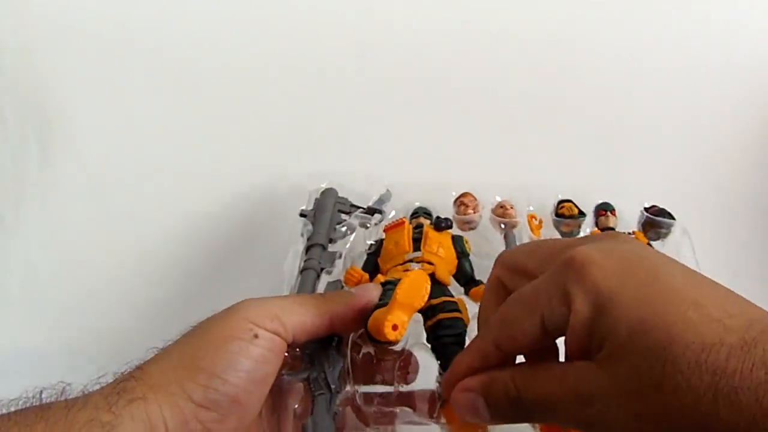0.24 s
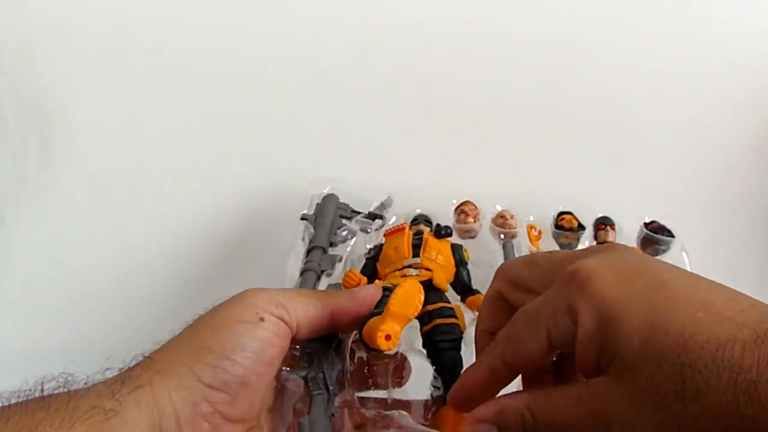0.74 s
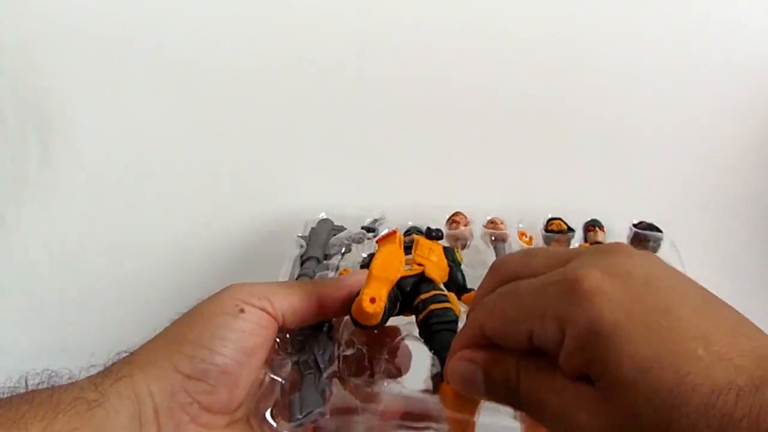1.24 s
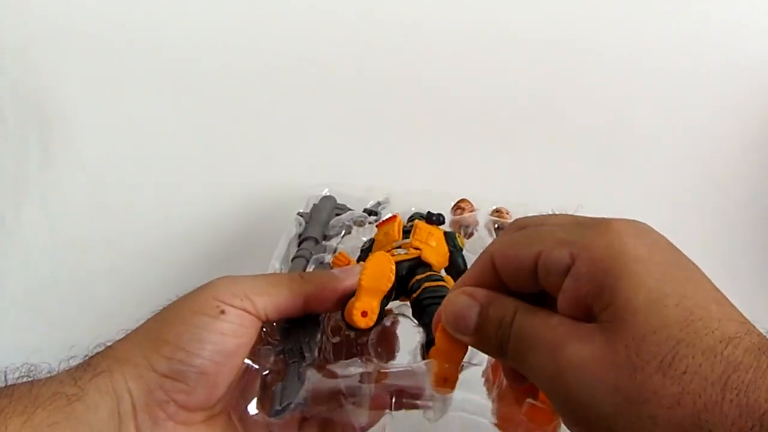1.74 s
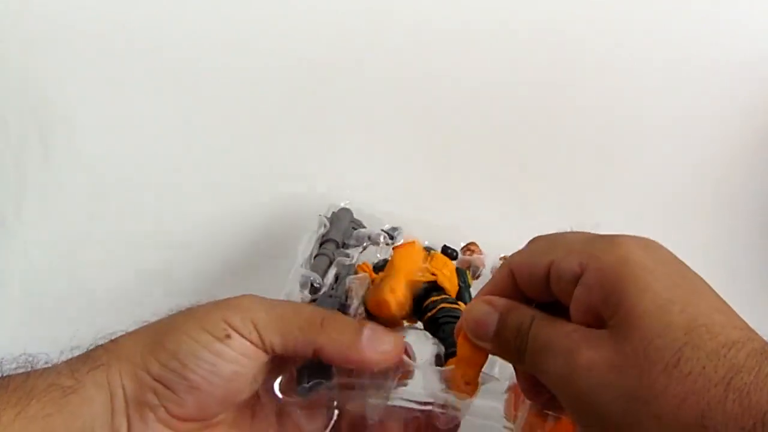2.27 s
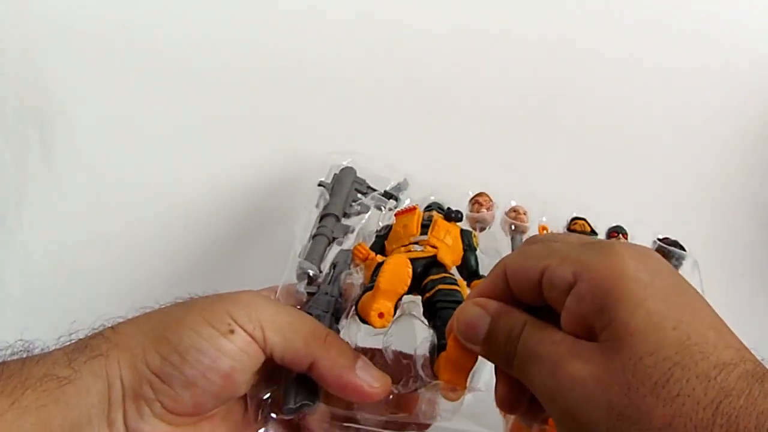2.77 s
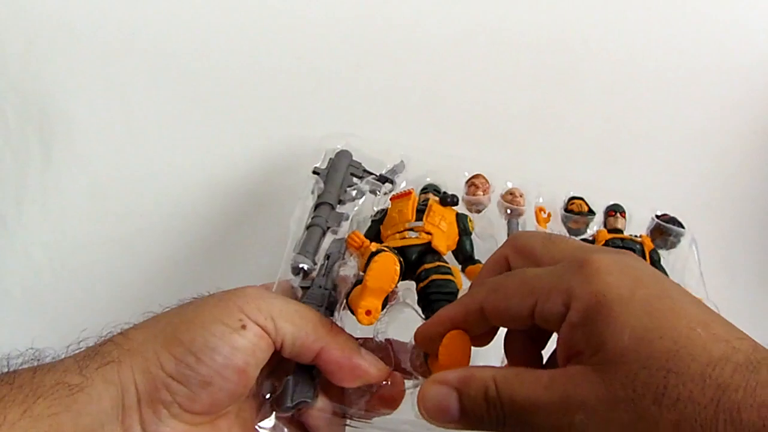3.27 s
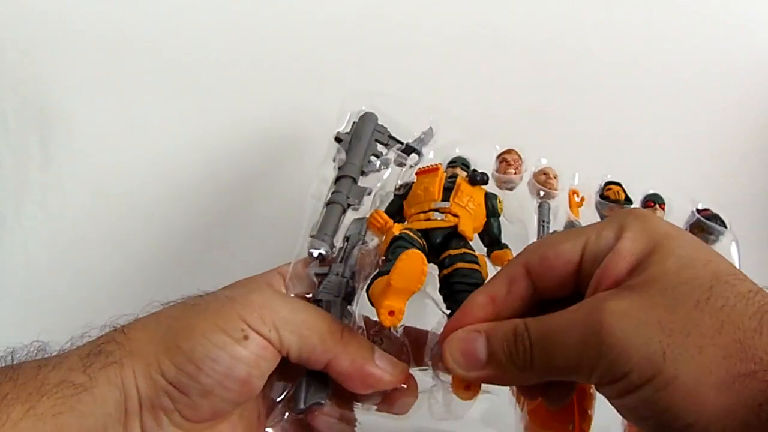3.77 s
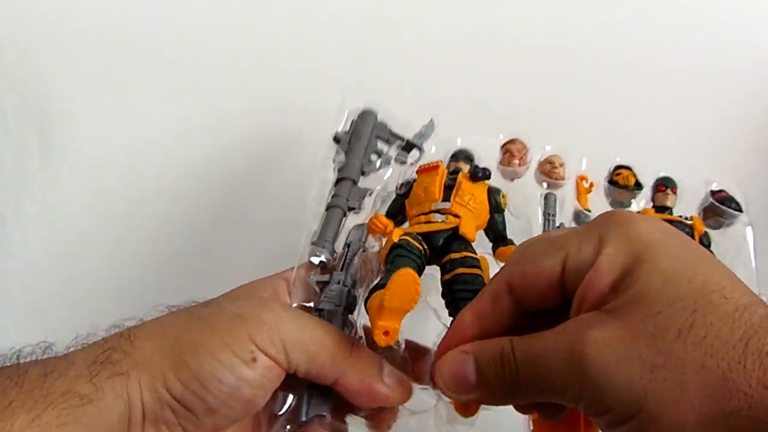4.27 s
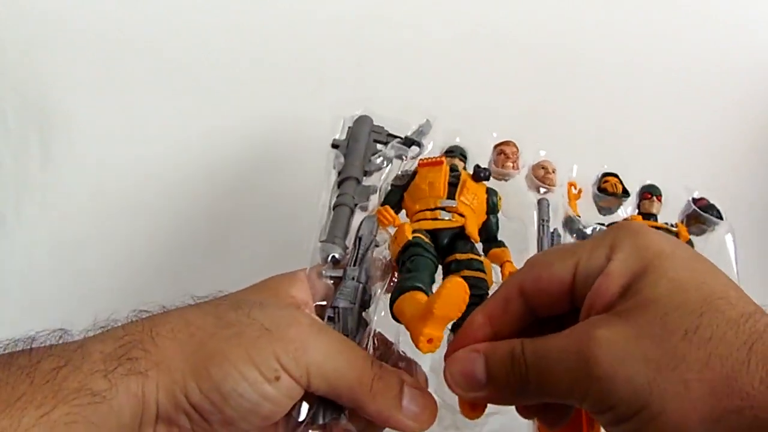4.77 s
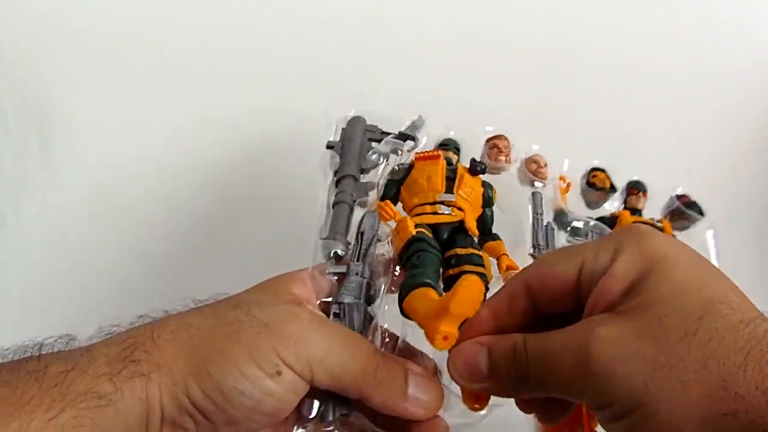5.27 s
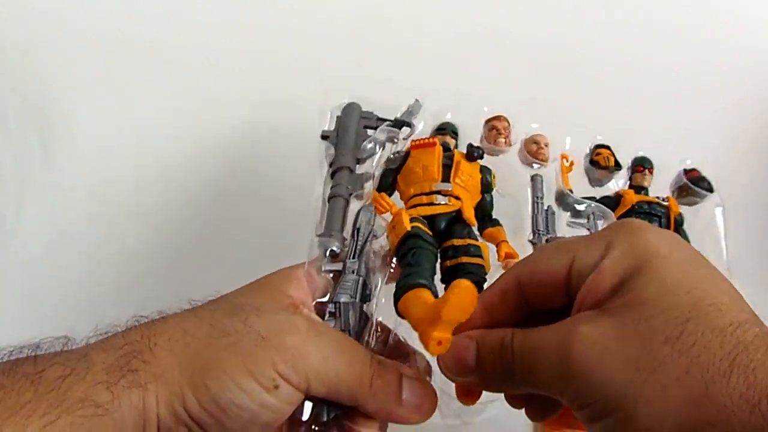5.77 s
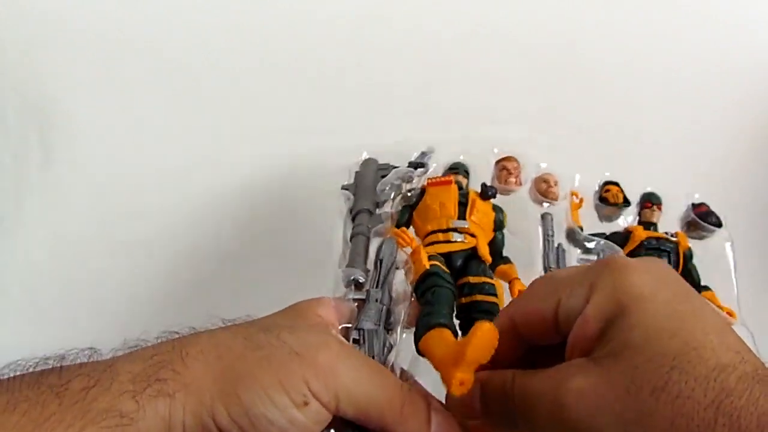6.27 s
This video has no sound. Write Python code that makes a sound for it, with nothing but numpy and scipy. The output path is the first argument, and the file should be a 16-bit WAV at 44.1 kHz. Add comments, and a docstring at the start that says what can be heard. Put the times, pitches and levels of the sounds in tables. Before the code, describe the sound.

Close to the microphone in a small room, a thin plastic tray crinkles and clicks as a toy figure is worked loose by hand. Short scratchy scrapes and dull finger taps mix with crisp, uneven pops of the flexing plastic. The crackling keeps coming in bursts, eases briefly near the end, then returns with another scrape and a sharp snap. A faint handling rumble and steady room air lie underneath.

```python
"""Sharp snaps lead: facets of a thin plastic blister tray buckle as two hands pry a toy figure out of it.
Each snap is a noise crack, a short ping and damped sheet modes, with a kick to the hollow tray.
The figure scrapes along its pocket in fine crackle, made of clumped stick-slip jerks that set off tiny rattles.
Fingers knock low ringing modes of the tray; handling rumble and room air, both coloured noise, lie beneath.
Everything is close to a microphone, with the short tail of a small room."""
import sys
import numpy as np
from scipy import signal
from scipy.io import wavfile
from scipy.ndimage import uniform_filter1d

SR = 44100
rng = np.random.default_rng(int(sys.argv[2]) if len(sys.argv) > 2 else 0)


def wav_out(sig):
    """Save sig, one row per channel (or a flat mono array), as 16-bit PCM at SR to the path in sys.argv[1]."""
    wavfile.write(sys.argv[1], SR, np.round(np.clip(np.atleast_2d(sig).T, -1, 1) * 32767).astype(np.int16))


N = 287658

# Facets that buckle audibly; the kick drives the hollow tray, relative to the level of the snap.
# Columns: start_s, level_db, brightness_db_per_octave, kick_db, ping_hz
FACET_SNAPS = [(0.192, -42, -4.5, 10.5, 1290), (0.2185, -40.5, 1.5, -15, 8900), (0.2549, -40, 4, -17, 6640),
               (0.3635, -47, -8.5, 13, 980), (0.392, -46, 3, 8, 12800), (0.416, -35.5, -2.5, -2, 1050),
               (0.44, -42, -5, -8, 1510), (0.4997, -41.5, 3, -7, 2200), (0.606, -36, -2.5, -1, 3400),
               (0.6518, -32.5, 3, -18, 13000), (0.677, -36, 3, -7, 6030), (0.7, -30, 2, -5, 3760),
               (0.7055, -25.5, -.5, -23, 12900), (0.915, -38, 0.5, -19, 4050),
               (1.0741, -39, -1.5, -7, 2130), (1.1681, -34, -3, -4, 3640), (1.182, -40, 3, 0, 1940),
               (1.1994, -31, 2.5, -2, 4750), (1.2782, -40.5, 6, 2, 5570), (1.406, -42.5, 2.5, -9, 14130),
               (1.419, -41, -0.5, -24, 2180), (1.484, -45.5, -3.5, -7, 1840), (1.5086, -39.5, 2, -1, 1770),
               (1.6673, -37, 2, -22, 14250), (1.768, -32, 0, -13, 3080), (1.8715, -37.5, -0.5, -6, 2780),
               (1.9272, -40.5, 2, -8, 2190), (2.012, -29, 1, -22, 2640), (2.048, -30.5, 0.5, -8, 4670),
               (2.0709, -25, -2.5, -8, 3430), (2.0946, -38, 0, 4, 6070), (2.136, -41, 0.5, -14, 12000),
               (2.198, -43.5, 3, -12, 5100), (2.3018, -37, -4, -3, 5230), (2.3537, -45.5, 5, -20, 12320),
               (2.421, -40.5, -3, 4.5, 2120), (2.5124, -34, -0.5, -1, 1750), (2.6491, -43, 2, -22, 12200),
               (2.6752, -41.5, -4, 3, 1850), (2.7825, -36, 0, -7, 1300), (2.8255, -32, 0, 5, 2970),
               (2.829, -22, -0.5, -0.5, 980), (2.834, -25, 1.5, -19, 2800), (2.882, -40, 3.5, -8, 3880),
               (3.0744, -44.5, 2.5, -20, 4700), (3.1095, -45, -5.5, 1, 5060),
               (3.1719, -50, -6.5, 12.5, 1860), (3.343, -45.5, 0, -4, 1470), (3.404, -48, 8, -17, 4800),
               (3.4186, -30, -1.5, -5.5, 2920), (3.4418, -40, 4, -3, 9300),
               (3.5213, -38.5, 0.5, -10, 13290), (3.5334, -39.5, -5, 6.5, 1840),
               (3.5908, -41, -1.5, 0, 3080), (3.663, -47.5, -2.5, -7, 1440), (3.696, -37.5, 1, -10, 3780),
               (3.7828, -38, 3, 4.5, 2260), (3.9232, -43.5, 1.5, 5.5, 14000),
               (4.1041, -23.5, 3, -9.5, 12360), (4.119, -28.5, -2.5, -1.5, 1850),
               (4.1995, -40, 4.5, -10, 12400), (4.3071, -33.5, -1.5, 2, 1490), (4.387, -37.5, 0, -10, 2430),
               (4.4206, -33.5, 1, -22, 4740), (4.4345, -23, .5, -19, 2920), (4.4372, -25, -2.5, -3, 1670),
               (4.446, -35.5, 3, 9.5, 1320), (4.6375, -34, -2.5, -5, 3780), (4.918, -36.5, -0.5, 3, 1540),
               (4.9309, -38.5, -6, 8, 1380), (4.974, -41, 5.5, -2, 4140), (5.038, -48, 6, -10, 12200),
               (5.0445, -38.5, 0.5, -5, 4800), (5.099, -28, -.5, -25, 5230), (5.2082, -39, -5.5, 7, 2740),
               (5.287, -43, 4, -15, 6030), (5.3228, -26, -1.5, -11, 2080), (5.35, -29, -3, -3, 1730),
               (5.383, -43, 5.5, -20, 6090), (5.4134, -34.5, -.5, -8, 1840), (5.9935, -28.5, 0.5, -9, 5660),
               (6.061, -38, 2.5, -10, 13400), (6.0941, -33, -1.5, -5, 1530), (6.1961, -41.5, 0, -1, 1480),
               (6.2542, -23.5, 0, 0, 3220), (6.4747, -42, -.5, 0, 4900), (6.49, -40, 0.5, -10, 1370)]
# Bands where large facets, small facets and creases ring. Columns: low_hz, high_hz
SHEET_ZONES = [(920, 2500), (2500, 6500), (6500, 15800)]
# Figure sliding in its pocket; hollow and fizz are relative to the force.
# Columns: start_s, length_s, force_db, hollow_db, fizz_db
SLIDE_STROKES = [(0.0, .045, -45, 10, -11), (0.164, .17, -45, 6, -4), (0.36, .15, -38.5, 5.5, -3.5),
                 (0.637, 0.086, -32.5, 2.5, -3), (0.73, .06, -45, -12, -6), (0.83, 0.073, -49.5, 2, -2),
                 (1.016, 0.013, -44.5, -14, -2), (1.157, 0.12, -37, -6.5, -3), (1.384, 0.2, -48.5, -20, 0),
                 (1.672, 0.16, -50.5, -3.5, 2), (1.875, 0.075, -39.5, 2.5, -9),
                 (2.009, .045, -37.5, -4, -12), (2.068, 0.033, -30.5, 0.5, -2.5),
                 (2.277, 0.03, -38.5, -4, -1.5), (2.363, 0.066, -42.5, -1.5, -7),
                 (2.507, 0.053, -43, -2, -11), (2.817, 0.083, -38.5, -2, -3),
                 (3.113, 0.017, -45.5, 2.5, -5), (3.269, 0.045, -46, -13, -26),
                 (3.362, 0.1, -38.5, -1, -4.5), (3.534, .06, -52, 8, -25), (3.947, 0.26, -46, 4.5, -23),
                 (4.063, 0.013, -37, 1.5, -5), (4.117, 0.094, -39.5, -1, -15),
                 (4.297, 0.07, -35.5, 1, -2.5), (4.441, 0.042, -35.5, -6, -4),
                 (4.507, 0.036, -45.5, 4, -14), (4.772, 0.018, -37, -6, -2.5), (4.853, .03, -55, 12, 2),
                 (4.941, 0.087, -41, 1.5, -6), (5.082, 0.046, -36.5, 2, 0), (5.211, 0.064, -32, -4, -5),
                 (5.3, 0.11, -41.5, -1, -6), (5.437, .16, -49, 2.5, -2), (5.828, 0.1, -37, -2, -5),
                 (5.892, .13, -35, 2, -3.5), (6.072, 0.021, -39, 6, -7), (6.11, 0.16, -49.5, 3, -4),
                 (6.25, 0.05, -43, 2, -2), (6.455, 0.022, -49, -15, -3)]
# Holding hand that keeps the sheet creaking faintly; fizz is relative to the force.
# Columns: time_s, force_db, fizz_db
HOLDING_GRIP = [(0, -49, -5), (.55, -46.5, -6), (1.0, -44.5, -4), (1.65, -52.5, -1), (2.3, -49, -3),
                (2.65, -48.5, -4), (3.0, -53, -14), (3.25, -56, -20), (3.55, -46, -18), (3.85, -50, -14),
                (4.4, -43.5, -16), (4.75, -50.5, -3), (5.5, -54.5, 5), (5.75, -48.5, -5), (6.2, -44.5, -2),
                (6.4, -54, -6), (6.52, -50, -5)]
# Spectrum of the coarse scrape. Columns: frequency_hz, gain_db
SCRAPE_COLOUR = [(500, -44), (800, 4.5), (950, 1.5), (1500, 3.5), (2500, -3), (4800, -2), (6500, -16),
                 (8500, -17.5)]
# Spectrum of the fine fizz. Columns: frequency_hz, gain_db
FIZZ_COLOUR = [(4000, -27), (6500, 14.5), (8500, 8.5), (10000, 9), (12500, 4), (16000, 7)]
# Spectrum of fingertips landing. Columns: frequency_hz, gain_db
THUD_COLOUR = [(40, -15.5), (70, 1), (130, 1.5), (200, -0.5), (300, -28), (600, -31)]
# Soft knocks of fingers and figure on the tray, relative peaks. Columns: start_s, level_db
TRAY_KNOCKS = [(0.412, -29), (0.467, -36), (0.501, -24.5), (0.638, -33), (1.019, -29), (1.158, -37),
               (2.54, -24), (2.673, -30.5), (3.097, -29), (3.172, -33), (4.222, -25), (4.295, -19),
               (4.361, -20.5), (4.447, -26.5), (4.476, -29), (4.857, -34), (5.081, -24), (5.229, -23.5),
               (6.395, -27.5)]
# Modes of the hollow tray, before the grip detunes them. Columns: pitch_hz, level_db, t60_s
TRAY_MODES = [(271, -7.5, 0.066), (325, -5.5, 0.053), (379.6, 3, 0.055), (444, 0, 0.034), (500, 2, 0.04),
              (577, 0, 0.035), (632, -12.5, 0.055), (747.4, -4, 0.11)]
# Shifts of the whole tray, with a low rumble. Columns: start_s, length_s, level_db
TRAY_SHIFTS = [(0.2, 0.53, -58), (2.414, 0.41, -49), (3.272, 0.37, -44.5), (3.7, 0.81, -53.5),
               (5.003, .48, -58.5), (5.865, .17, -46.5)]
# Spectrum of the handling rumble. Columns: frequency_hz, gain_db
RUMBLE_SPECTRUM = [(8, -13), (20, 11), (40, 7.5), (60, -1.5), (110, -4), (300, -33)]
# Spectrum of the steady room air. Columns: frequency_hz, gain_db
AIR_COLOUR = [(30, -14), (100, -20.5), (200, -12.5), (370, 4.5), (550, 1), (720, -1), (1400, -13),
              (3000, -8.5), (6000, -17.5), (16000, -43)]
# Decay of the room tail. Columns: frequency_hz, t60_s
ROOM_DECAY = [(250, 0.23), (700, 0.31), (1800, 0.2), (4600, 0.36), (12000, 0.21)]
# Spectrum of the room tail at its start. Columns: frequency_hz, gain_db
ROOM_SPECTRUM = [(150, -6), (400, 4.5), (750, -4), (1400, 4.5), (3000, 0.5), (6000, -2), (15000, 2)]
# Response of the microphone. Columns: frequency_hz, gain_db
MIC_RESPONSE = [(620, 1), (680, -6.5), (850, -5.5), (920, 1), (7200, 0.5), (7650, -3), (7820, -14),
                (8000, -0.5), (8400, 0.5), (9500, -1.5), (12500, 1), (15500, -0.5)]

# share of each zone in a snap; lift of the zone that holds the ping; where brightness pivots
ZONE_DB, OWN_ZONE_DB, PIVOT_HZ = [0.5, 3, 0.5], 3, 4020
ATTACK_S, RELEASE_S = 0.025, 0.02  # rise before the start of a hand move; time constant of its release
GRIP_HOLLOW_DB = -1  # relative to the force of the grip
STILL_DB = -58  # rumble of the hands at rest, on the same scale as the shifts
TIME = np.arange(N) / SR


def snaps(sheet_db=0, body_db=1):
    """Each facet flips over, rings, and kicks the whole tray."""
    out = np.zeros(N)
    span = np.sqrt(0.005 * SR)  # sets unit energy to unit rms over 5 ms
    for start, level_db, brightness, kick_db, ping_hz in FACET_SNAPS:
        kick = unit(body_ring())
        add(out, start, span * amp(level_db + kick_db + body_db) * kick)
        add(out, start, span * amp(level_db + sheet_db) * buckle(brightness, ping_hz))
    return out


def buckle(brightness, ping_hz):
    """One facet flips: all zones of the sheet ring, its own lifted, tilted by the sharpness of the flip."""
    zones = []
    for (low_hz, high_hz), share_db in zip(SHEET_ZONES, ZONE_DB):
        octaves = np.log2(np.sqrt(low_hz * high_hz) / PIVOT_HZ)
        own_db = OWN_ZONE_DB * (low_hz <= ping_hz < high_hz)
        zones.append(amp(share_db + brightness * octaves + own_db) * facet_ring(low_hz, high_hz, ping_hz))
    return sum(zones)


def facet_ring(low_hz, high_hz, ping_hz, t60_s=0.03, fall=0.71, ping_share=1.2, ping_s=0.00075,
               crack_share=1.02, crack_s=0.0036, rise_s=0.000045, count=22, size=1200):
    """A crack, the facet's own short ping, and a cluster of damped sheet modes; higher ones die sooner."""
    t = np.arange(size) / SR
    # one mode at random in each equal slice of the band
    hz = (low_hz + (high_hz - low_hz) * (np.arange(count) + rng.random(count)) / count)[:, None]
    decay = amp(-60 * t / (t60_s * (2000 / hz) ** fall))  # t60_s and ping_s hold at 2 kHz
    modes = np.sin(2 * np.pi * (hz * t + rng.random(hz.shape))) * decay
    swell_s = ping_s * np.sqrt(2000 / ping_hz)
    ping = unit(t * np.exp(-t / swell_s) * np.sin(2 * np.pi * ping_hz * t))
    ping = (low_hz <= ping_hz < high_hz) * ping  # only its own zone pings
    band = signal.butter(3, [low_hz, high_hz], "band", fs=SR, output="sos")
    burst = np.sign(rng.standard_normal(size)) * np.exp(-t / crack_s)
    crack = unit(signal.sosfilt(band, burst))
    flip = 1 - np.exp(-t / rise_s)  # the facet takes a moment to turn over
    return unit(flip * (unit(modes.sum(axis=0)) + crack_share * crack + ping_share * ping))


def crumple(force, crumple_db=-8, brightness=1.0, low_hz=1400, high_hz=13000, count=16):
    """Lesser facets buckle at random, as hard as the sheet is forced."""
    rings = [unit(buckle(brightness, hz)) for hz in np.geomspace(low_hz, high_hz, count)]
    jerks = slips(per_s=70, spread_db=-0.5, limit=1.0)
    return amp(crumple_db) * force * evened(crackle(jerks, rings))


def ticks(force, tick_db=-51, follow=0.5, low_hz=1800, high_hz=12500, count=24):
    """Small facets let go at random, each a narrow-band rattle around its own pitch."""
    rings = []
    for hz in np.geomspace(low_hz, high_hz, count):
        edges_hz = [hz / 1.25, min(hz * 1.25, 0.45 * SR)]
        band = signal.butter(2, edges_hz, "band", fs=SR, output="sos")
        rings.append(unit(signal.sosfilt(band, grain(decay_s=0.0006))))
    strain = force ** follow  # they grow only a little with the force on the tray
    jerks = slips(per_s=45, spread_db=4.0, limit=2.9)
    return amp(tick_db) * evened(strain * crackle(jerks, rings))


def rubbing(force, pressure, fizz, press_db=-3.5, scrape_db=-2, fizz_db=-2, thud_db=-16,
            clump_db=4.0, fine_share=0.44, count=16):
    """Slips come in clumps: coarse ones scrape, coarse and fine ones fizz, and pressure shakes the body."""
    swells = evened(uniform_filter1d(rng.standard_normal(N), size=260))  # averaged over about 6 ms
    clumps = amp(clump_db * swells)
    coarse_slips = slips(per_s=2000, spread_db=2.0) * clumps
    coarse = crackle(coarse_slips, [grain(decay_s=0.0021) for _ in range(count)])
    fine_slips = slips(per_s=1900, spread_db=0.5) * clumps
    fine = crackle(fine_slips, [grain(decay_s=0.00091) for _ in range(count)])
    pushes = slips(per_s=400, spread_db=1.5) * clumps
    hollow = evened(crackle(pushes, [body_ring() for _ in range(count)]))
    pads = evened(colour(pushes, THUD_COLOUR))  # soft fingertips add a dull thud to each push
    scrape = evened(colour(coarse, SCRAPE_COLOUR))
    hiss = evened(colour(coarse + fine_share * fine, FIZZ_COLOUR))
    return (pressure * (amp(press_db) * hollow + amp(thud_db) * pads)
            + amp(scrape_db) * force * scrape
            + amp(fizz_db) * fizz * hiss)


def contact():
    """How hard grip and strokes drive the scrape, the hollow body and the fizz; their powers add."""
    s, force_db, fizz_db = np.transpose(HOLDING_GRIP)
    grip = amp([np.interp(TIME, s, force_db + share_db) for share_db in (0, GRIP_HOLLOW_DB, fizz_db)])
    gains = amp([(db, db + hollow_db, db + stroke_fizz_db)
                 for _, _, db, hollow_db, stroke_fizz_db in SLIDE_STROKES])
    moves = np.array([move(start, length) for start, length, *_ in SLIDE_STROKES])
    return np.sqrt(grip ** 2 + gains.T ** 2 @ moves ** 2)


def move(start, length):
    """Attack, hold and release of one move of the hands."""
    attack = np.clip((TIME - start) / ATTACK_S + 1, 0, 1) ** 2
    release = np.exp(-np.clip((TIME - start - length) / RELEASE_S, 0, 20))
    return attack * release


def slips(per_s, spread_db, limit=3.17):
    """Stick-slip: a random train of tiny jerks of either sign, their sizes scattered up to a limit."""
    sizes = amp(spread_db * np.minimum(rng.exponential(1, N), limit))
    return evened(sizes * rng.choice([-1, 1], N) * (rng.random(N) < per_s / SR))


def crackle(jerks, rings):
    """Each jerk sets off one of several rings, each with its own colour."""
    choice = rng.integers(0, len(rings), N)
    return sum(signal.oaconvolve(jerks * (choice == k), ring)[:N] for k, ring in enumerate(rings))


def grain(decay_s, size=300):
    """The tiny rattle of one facet after one slip: a decaying noise burst."""
    return unit(rng.standard_normal(size) * np.exp(-np.arange(size) / SR / decay_s))


def knocks(knock_db=-2):
    """Soft blows reach only the low modes of the tray."""
    out = np.zeros(N)
    for start, level_db in TRAY_KNOCKS:
        ring = body_ring()
        add(out, start, amp(level_db + knock_db) * ring / abs(ring).max())
    return out


def body_ring(detune=0.066, lowest_hz=215, size=5000):
    """The hollow tray after one push; the grip shifts its modes, and it is too small to radiate bass."""
    t = np.arange(size) / SR
    hz, db, t60 = np.transpose(TRAY_MODES)[:, :, None]
    hz = hz * (1 + detune * (2 * rng.random(hz.shape) - 1))
    modes = amp(db - 60 * t / t60) * np.sin(2 * np.pi * hz * t)
    ring = rng.choice([-1, 1], len(TRAY_MODES)) @ modes  # random polarity for each mode
    return signal.sosfilt(signal.butter(4, lowest_hz, "high", fs=SR, output="sos"), ring)


def background(rumble_db=-1, air_db=-53):
    """Low bumps of handling, stronger as the tray is shifted, and the steady air of the room."""
    shifts = sum(amp(db) * move(start, length) for start, length, db in TRAY_SHIFTS)
    handling = amp(STILL_DB) + shifts
    bumps = evened(colour(slips(per_s=330, spread_db=3.0), RUMBLE_SPECTRUM)) * handling
    air = evened(colour(rng.standard_normal(N), AIR_COLOUR))
    return amp(rumble_db) * bumps + amp(air_db) * air


def room(x, wet_db, first_s=0.004, echo_s=0.0085, echo_db=-19, size=22050):
    """A short diffuse tail of sparse echoes, plus one early bounce off the table."""
    taps = rng.standard_normal(size) * (rng.random(size) < 5000 / SR)  # 5000 echoes per second
    hz, t, z = signal.stft(taps, SR, nperseg=256)
    z = z * amp(read(ROOM_SPECTRUM, hz)[:, None] - 60 * t / read(ROOM_DECAY, hz)[:, None])
    tail = unit(signal.istft(z, SR, nperseg=256)[1])
    response = np.zeros(size)
    add(response, first_s, amp(wet_db) * tail)
    add(response, echo_s, amp([echo_db]))
    return x + signal.oaconvolve(x, response)[:N]


def amp(db):
    """Decibels to gain."""
    return 10 ** (np.asarray(db) / 20)


def evened(x):
    """Scales to rms 1."""
    return x / np.sqrt(np.mean(x ** 2) + 1e-20)


def unit(x):
    """Scales to energy 1."""
    return x / (np.linalg.norm(x) + 1e-12)


def read(points, hz):
    """Reads a curve on a log-frequency axis."""
    f, value = np.transpose(points)
    return np.interp(np.log(hz + 1), np.log(f + 1), value)


def colour(x, points):
    """Causal minimum-phase filter with the given spectrum."""
    size = 8192
    log_gain = np.log(amp(read(points, abs(np.fft.fftfreq(size, 1 / SR)))))
    # the Hilbert transform of the log gain gives the minimum phase
    taps = np.fft.ifft(np.exp(np.conj(signal.hilbert(log_gain)))).real
    return signal.oaconvolve(x, taps[:size // 2])[:len(x)]


def add(mix, s, sound):
    """Mixes a sound in at time s, in place."""
    part = mix[max(round(s * SR), 0):][:len(sound)]
    part += sound[:len(part)]


def scene():
    """The tray in its room, each layer with its own amount of tail."""
    force, pressure, fizz = contact()
    sheet = snaps() + crumple(force) + ticks(force)
    rubs = rubbing(force, pressure, fizz)
    mix = room(sheet, wet_db=-11.5) + room(knocks(), wet_db=-7) + room(rubs, wet_db=-10.0) + background()
    return mix[None]


def record(dry):
    """A small microphone with a narrow treble notch; loud peaks are rounded off; then the band limit."""
    heard = np.array([colour(channel, MIC_RESPONSE) for channel in dry])
    heard = heard / (1 + (heard / 0.75) ** 4) ** 0.25  # never exceeds 0.75
    lowpass = signal.firwin(511, 15900, window=("kaiser", 8), fs=SR)  # cutoff in Hz
    return signal.oaconvolve(heard, lowpass[None], "same")


dry = scene()
out = record(dry)
wav_out(out)
```